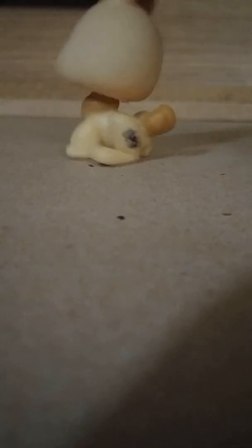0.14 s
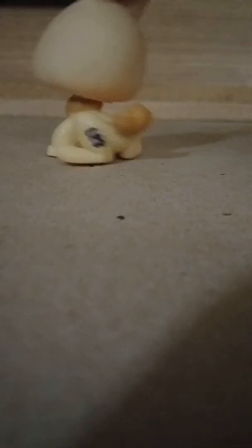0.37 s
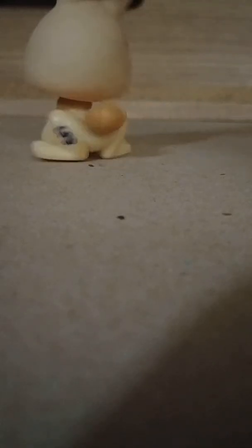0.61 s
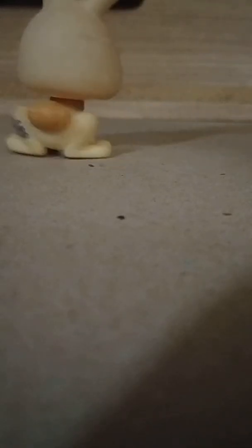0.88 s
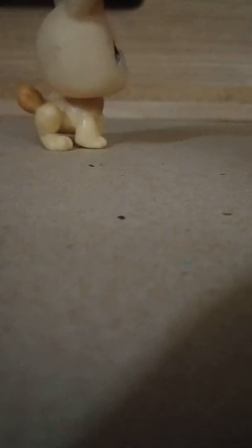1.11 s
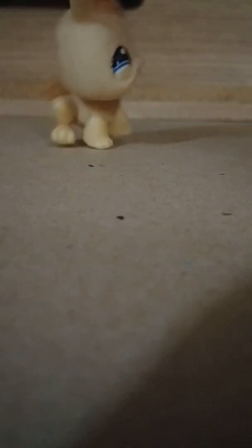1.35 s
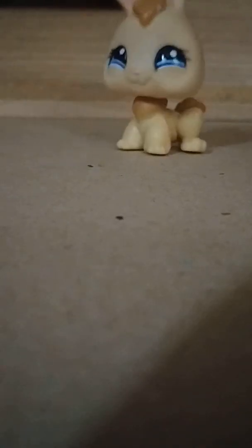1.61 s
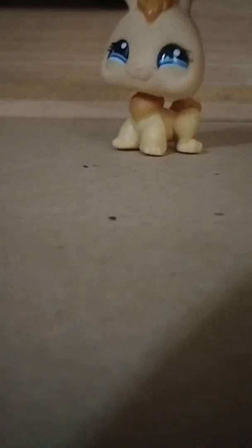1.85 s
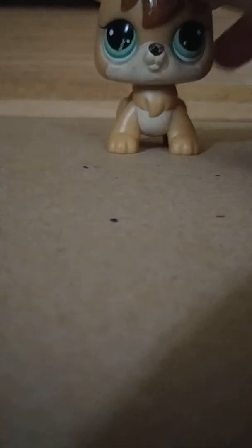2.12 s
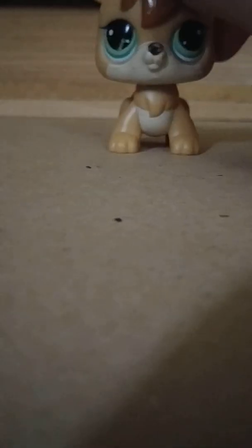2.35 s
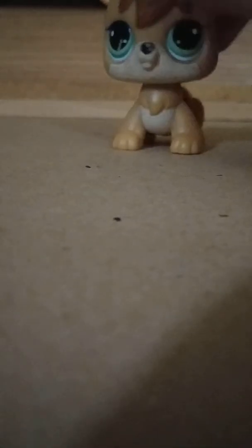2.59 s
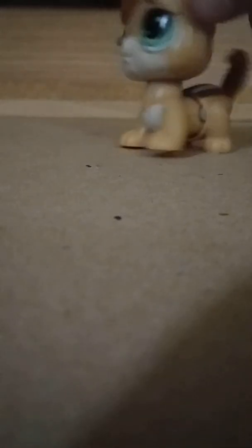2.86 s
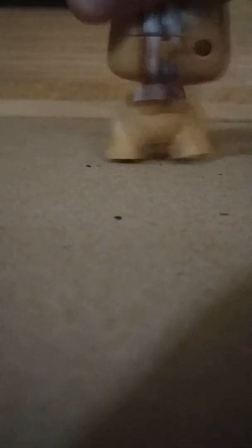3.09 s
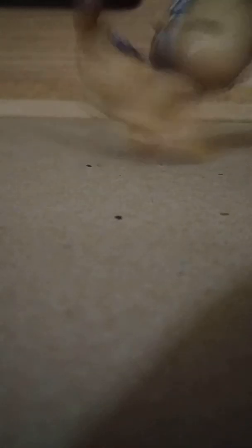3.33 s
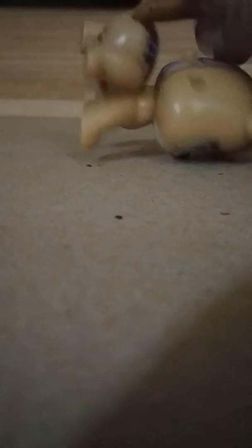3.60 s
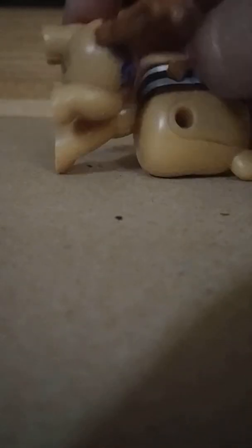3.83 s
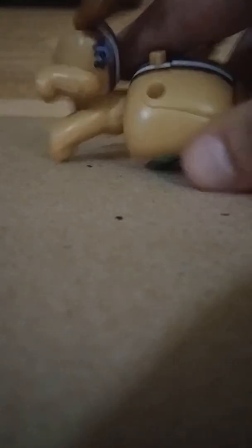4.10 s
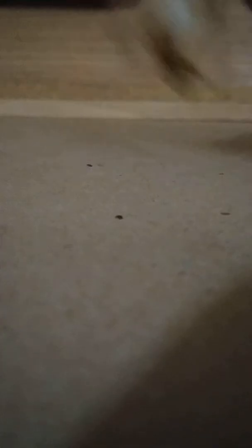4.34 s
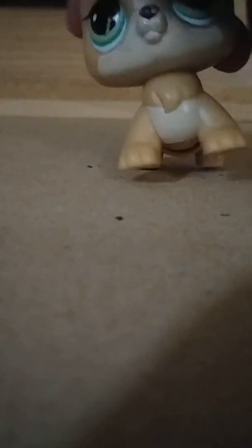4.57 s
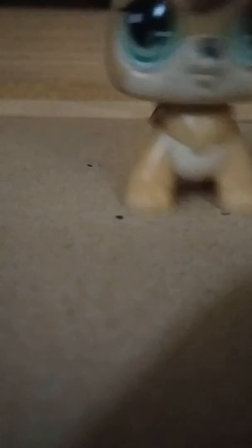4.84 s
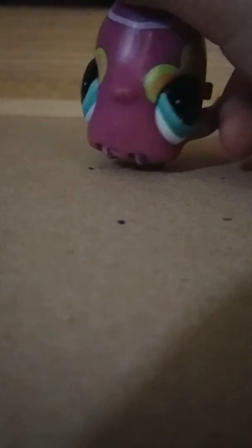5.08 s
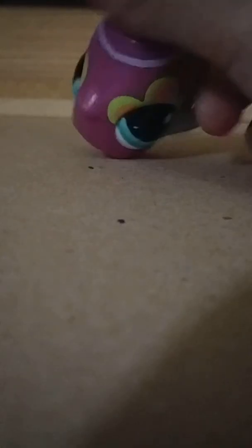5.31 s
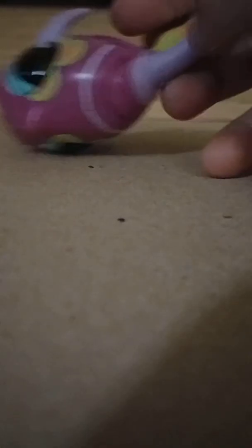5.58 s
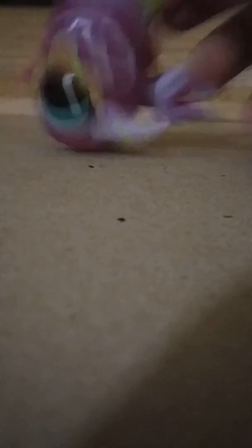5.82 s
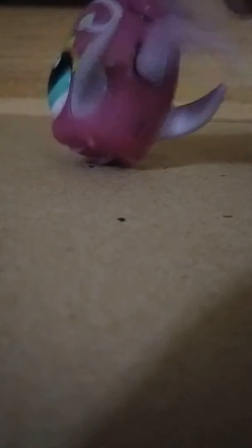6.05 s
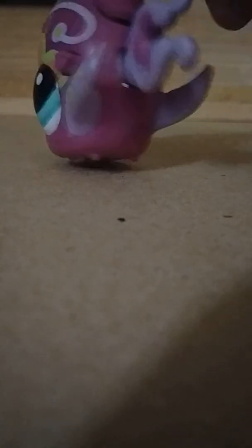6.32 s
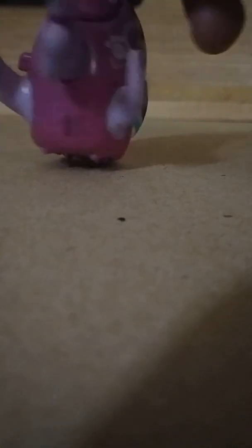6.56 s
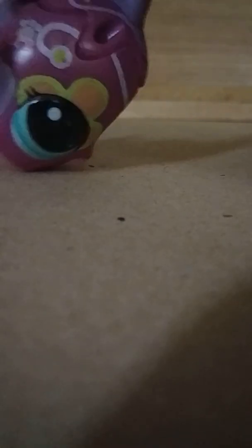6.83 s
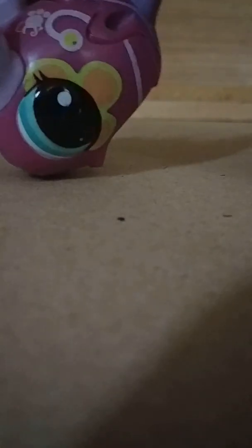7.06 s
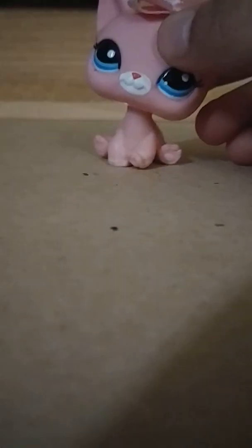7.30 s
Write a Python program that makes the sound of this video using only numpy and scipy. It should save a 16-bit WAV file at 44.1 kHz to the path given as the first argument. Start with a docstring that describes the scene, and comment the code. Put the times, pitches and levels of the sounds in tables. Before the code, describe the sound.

Small hard plastic figures are turned and moved by hand on a covered board, heard very close by a device lying on it. Soft dull bumps and faint rubs come first over low room hum, then a burst of loud boomy thuds with bright clicks and scrapes. A brief drone stops at a sudden cut, followed by gentler knocks and clicks.

```python
"""Over a low mains hum and room noise, small plastic figures are turned, dropped and dragged by hand on a board.
It starts with soft thuds and faint rubbing; from 3.1 s come heavy thuds, bright clicks and dragging feet.
Near 4.9 s a dragged figure drones; at 5 s a splice cuts off thuds, rumble and drone; softer thuds and clicks follow.
Thuds are struck board modes, ticks are noise cracks in shell resonances, rubs are lumpy filtered noise.
A phone lying on the board hears it all: the board directly, the plastic through the air."""
import sys
import numpy as np
from scipy import signal
from scipy.fft import rfft, irfft, next_fast_len
from scipy.io import wavfile
from scipy.ndimage import uniform_filter1d, map_coordinates

SR = 44100
rng = np.random.default_rng(int(sys.argv[2]) if len(sys.argv) > 2 else 0)


def convert_level_to_amplitude(level_db):
    """Map a level in decibels to its linear amplitude factor."""
    exponent = np.asarray(level_db, float) / 20
    return 10 ** exponent


def persist_wave(psi):
    """Save psi, clipped to +-1, as 16-bit WAV."""
    counts = np.round(np.clip(psi, -1, 1) * 32767).astype(np.int16)
    wavfile.write(sys.argv[1], SR, np.atleast_2d(counts).T)


N = 327655
TIME = np.arange(N) / SR
SPLICE_S = 5.002  # a splice: thuds, their settling rumble and the drone are cut off here

# All levels are relative; some sources add a trim.
# hum partials: pitch_hz, level_db
HUM = [(118.4, -48.5), (236.9, -43), (360.7, -55)]
# room noise spectrum: frequency_hz, level_db
ROOM_COLOUR = [(29, -43), (50, -17.5), (102, -1), (165, -6.5), (239, -2), (284, -10), (361, -7.5),
               (403, -16.5), (635, -17.5), (919, -29), (1390, -36), (7730, -56.5), (9000, -65),
               (11700, -88), (19800, -120)]
# likeness of the room noise at left and right: frequency_hz, likeness (0 to 1)
ROOM_LIKENESS = [(60, 1), (130, 0.68), (290, 1), (640, 0.51), (1400, .02)]
# treble shade of the phone's body on the right microphone: frequency_hz, level_db
SHADOW = [(2000, -6), (5000, -3), (8000, -6), (15000, -23)]
# treble colour of the phone: frequency_hz, level_db
PHONE_COLOUR = [(1000, 17.5), (3000, 3), (5200, 7), (6600, -2), (8100, 4), (9400, -11), (10600, -27.5),
                (11900, -19.5), (15400, -23), (16100, -49)]
# resonances of the microphone port, heard louder at the left: pitch_hz, width_hz, level_db (before squaring)
PORT = [(7930, 950, 1), (13100, 3100, -18.5)]
# phase of the board between the microphones: frequency_hz, left_lead_rad
BOARD_LEAD = [(40, .7), (80, 2.6), (150, 1.25), (260, -.9), (420, -1.3), (600, -2.2), (950, -1.1),
              (1900, .6)]
# level of the board between the microphones: frequency_hz, left_over_right_db
BOARD_TILT = [(80, 2), (150, 1), (210, 2.5), (330, 8), (600, -1.5), (1300, 3), (2400, 6)]
# low modes of the board: pitch_hz, level_db, t60_s
BOARD_MODES = [(72.7, -8.5, 0.43), (153.15, 1.5, 0.15), (198.1, 3, 0.11), (228.5, -1.5, 0.18),
               (293, -5.5, 0.16), (329.2, -9, 0.093), (396, -11.5, 0.12)]
# outline of the dense upper modes: pitch_hz, level_db, t60_s
UPPER_OUTLINE = [(496, -27, 0.15), (821, -27.5, 0.093), (1100, -29.5, 0.082), (1850, -45.5, 0.049),
                 (2816, -64, 0.26)]
# rumble kept up by the hand's grip: time_s, level_db
GRIP = [(0.0, -39), (0.23, -44.5), (2.81, -58), (3.33, -70), (3.49, -39.5), (3.72, -21), (3.87, -23.5),
        (4.05, -24), (4.28, -30.5), (4.84, -24), (4.99, -51), (6.0, -22), (6.27, -40), (7.43, -67)]
# position of the hand: time_s, left_over_right_db
HAND = [(0, -1), (0.9, -2), (1.6, -4), (1.8, -16), (2.15, -28), (2.25, -1), (2.6, -6), (3.1, 1.5), (4.5, 1),
        (4.9, 7), (6.1, 23.5), (7.43, -14)]
# sliding strokes: start_s, end_s, feet_on_cover_db, fingers_on_plastic_db, port_hiss_db
STROKES = [(0, 0.023, -48, -59, -89), (0.163, 0.228, -47.5, -63, -78), (0.511, 0.58, -45.5, -60.5, -73),
           (0.624, 0.672, -41, -59.5, -63.5), (0.871, 1.023, -55, -66, -50), (0.932, 1.038, -42, -57, -80),
           (1.143, 1.3, -73, -82, -58.5), (1.325, 1.445, -53, -61.5, -65), (1.37, 1.629, -56.5, -61, -62.5),
           (1.521, 1.554, -43, -66, -76), (1.801, 1.9, -51, -52, -56.5), (2.01, 2.159, -60, -56.5, -69),
           (2.192, 2.316, -74, -58.5, -60), (2.49, 2.625, -51, -58, -70), (2.672, 2.772, -51.5, -57.5, -58),
           (2.817, 2.895, -40.5, -56, -53), (2.903, 3.096, -44.5, -73, -67), (3.013, 3.2, -38, -53, -49.5),
           (3.207, 3.341, -34.5, -48, -45), (3.342, 3.382, -25, -35, -44), (3.368, 3.413, -26, -36, -36),
           (3.426, 3.495, -35, -45, -54), (3.674, 3.757, -42.5, -43, -86), (3.75, 4.039, -39, -46, -55.5),
           (3.943, 4.052, -30, -50, -54), (4.054, 4.229, -41, -43.5, -49.5), (4.201, 4.331, -38, -46, -73),
           (4.435, 4.525, -64.5, -39, -91), (4.505, 4.591, -33.5, -43.5, -82),
           (4.776, 5.003, -25, -38.5, -40.5), (5.232, 5.339, -34.5, -45.5, -65),
           (5.355, 5.442, -29.5, -49.5, -51.5), (5.42, 5.515, -41, -58.5, -52),
           (5.694, 5.864, -45, -66.5, -76), (5.812, 5.901, -36.5, -43.5, -86),
           (6.021, 6.063, -47.5, -60, -55.5), (6.053, 6.13, -33, -47.5, -59), (6.167, 6.259, -52, -67, -76),
           (6.258, 6.324, -45.5, -62, -95), (6.487, 6.522, -52.5, -89.5, -61),
           (6.643, 6.721, -42, -52, -51), (6.736, 6.765, -80.5, -47, -62), (6.777, 6.821, -89, -46, -59),
           (7.129, 7.234, -83, -73, -55.5), (7.199, 7.247, -54, -58, -92)]
# spectrum of feet on the cover: frequency_hz, level_db
SCRAPE_COLOUR = [(250, -39), (420, -22.5), (600, 5.5), (1100, -2.5), (2000, -11.5), (2500, -40),
                 (4000, -76)]
# spectrum of fingers on plastic: frequency_hz, level_db
FINGER_COLOUR = [(880, -54), (1500, -16.5), (2370, -2), (3660, -9), (5280, -5), (6830, -12), (8000, -3.5),
                 (10800, -54), (12000, -21), (15400, -20), (16100, -53)]
# narrow hisses of slipping skin or feet: start_s, end_s, pitch_hz, width_hz (before squaring), level_db
SLIPS = [(1.421, 1.443, 1480, 169, -40), (1.415, 1.456, 2930, 480, -55), (2.045, 2.107, 4400, 2570, -55),
         (2.096, 2.142, 2320, 1400, -42), (2.92, 3.145, 1450, 1467, -51.5), (3.02, 3.075, 13800, 1250, -55),
         (3.126, 3.151, 3770, 343, -42), (3.831, 3.907, 8050, 780, -30), (3.857, 3.903, 12400, 700, -49),
         (4.265, 4.383, 4070, 1600, -44), (4.527, 4.555, 1550, 895, -19), (5.185, 5.21, 2300, 800, -42),
         (6.866, 6.962, 5800, 604, -58)]
# feet sticking and slipping in step with a board mode: start_s, end_s, pitch_hz, level_db
JUDDER = [(4.878, 4.94, 226, -4), (4.944, 5.016, 237, -2)]
# plastic clicks: start_s, level_db, pitch_hz
TICKS = [(3.1305, -38.5, 8100), (3.2637, -39, 6700), (3.3755, -34, 7900), (3.4281, -15.5, 7100),
         (3.474, -30.5, 3150), (3.5232, -39.5, 6600), (3.6251, -40, 7820), (3.6885, -23.5, 6400),
         (3.693, -13, 4730), (3.709, -26, 4600), (3.7234, -27.5, 5530), (3.7407, -35, 5340),
         (3.8379, -34, 6060), (3.8537, -22, 7300), (3.896, -34, 5500), (3.9293, -32, 5440),
         (4.031, -17, 7900), (4.0325, -21, 4800), (4.05, -34.5, 7000), (4.13, -27, 5000), (4.14, -12, 4930),
         (4.156, -23.5, 7440), (4.2414, -21, 4600), (4.2764, -30.5, 7400), (4.4502, -16.5, 8100),
         (4.4495, -15, 4204), (4.4548, -13, 7900), (4.526, -21, 2500), (4.5295, -29.5, 7600),
         (4.5429, -14.5, 7610), (4.794, -37, 5940), (4.802, -20, 5900), (4.817, -27, 7050),
         (4.8814, -23.5, 7550), (5.1847, -29, 2370), (5.1971, -40, 7700), (5.2544, -26, 5350),
         (5.257, -44, 13500), (5.2868, -34, 5900), (5.7692, -41.5, 6390), (5.7752, -36, 2260),
         (5.8371, -29.5, 5300), (5.8434, -22, 2360), (5.8546, -24.5, 7270), (5.8645, -22, 2650),
         (5.8966, -27.5, 2060), (6.0775, -31.5, 6400), (6.0777, -19.5, 2100), (6.0944, -22, 2200),
         (6.096, -25.5, 7000), (6.1087, -32, 7400), (6.117, -30.5, 5400), (6.211, -36.5, 8760),
         (6.2192, -42, 7300), (6.2756, -36, 7300), (6.2758, -27.5, 2190), (6.4971, -32.5, 8530),
         (6.499, -44, 13200), (6.7381, -33, 3120), (6.7535, -21, 5150), (6.7575, -22.5, 2650),
         (6.772, -37.5, 2840), (6.789, -25.5, 2800), (6.7985, -32, 5200), (6.805, -31, 8160),
         (7.2, -46.5, 2770)]
# landings on the board: start_s, level_db, hardness_db (upper modes against lower)
THUDS = [(0.02, -25.5, -12), (0.122, -29.5, -41), (0.364, -27.5, -26), (0.514, -23, -18),
         (0.539, -31.5, -7), (0.637, -23, -12), (0.84, -26.5, -26), (0.966, -30.5, -2.5), (0.993, -26, -10),
         (1.005, -27.5, -37), (1.374, -43, -9), (1.392, -39, -14), (1.42, -42.5, 1), (1.508, -27, -15.5),
         (1.521, -29.5, -9), (1.539, -34, -9.5), (1.592, -28, -13.5), (1.703, -26.5, -20.5),
         (1.945, -24, -22.5), (1.997, -29, -18), (2.826, -36, -2), (3.133, -17, -12.5), (3.151, -9, -17.5),
         (3.231, -31.5, -1.5), (3.257, -7.5, -22), (3.3738, 0.5, -15), (3.427, 9.5, -14), (3.689, 3.5, -14),
         (3.817, -6.5, -27.5), (3.849, -18.5, -7.5), (3.879, -5.5, -34), (3.98, -3, -26),
         (4.025, -1.5, -29.5), (4.1366, -1, -14), (4.237, -1.5, -10), (4.4485, 0, -6.5), (4.532, -5.5, -15),
         (4.73, -17, -31), (4.791, -0.5, -25), (4.816, -1, -17.5), (4.836, 0, -47), (4.864, -7.5, -9.5),
         (5.183, -25.5, -37.5), (5.254, -6, -33), (5.405, -16.5, -17), (5.471, -13.5, -27.5),
         (5.764, -15, -26.5), (5.822, -18.5, -19.5), (5.837, -7.5, -24), (5.88, -8, -23.5),
         (5.925, -4.5, -33.5), (6.064, -21, -19), (6.078, -9.5, -35), (6.278, -30, -15),
         (6.693, -24.5, -17.5), (6.849, -17.5, -38), (7, -24, -29), (7.242, -26, -29.5)]


def unit(x):
    """Scale to rms 1."""
    return x / np.sqrt(np.mean(x ** 2) + 1e-20)


def along(points, hz):
    """Read (frequency, value) points on a log frequency axis."""
    f, value = np.transpose(points)
    return np.interp(np.log(hz + 1), np.log(f + 1), value)


def wobble(rate):
    """A smooth random curve with rate knots a second."""
    return map_coordinates(rng.standard_normal(int(N * rate / SR) + 4), [TIME * rate])


def filtered(x, response):
    """Filter x with a complex response of frequency."""
    m = next_fast_len(N + SR // 2)
    return irfft(rfft(x, m) * response(np.fft.rfftfreq(m, 1 / SR)), m)[..., :N]


def resonances(modes):
    """Response of summed (pitch_hz, width_hz, level_db) resonances, alternating in sign."""
    def response(f):
        return sum((-1) ** k * convert_level_to_amplitude(db) * 1j * f * width / (hz * hz - f * f + 1j * f * width)
                   for k, (hz, width, db) in enumerate(modes))
    return response


def pair(likeness):
    """Two white noises with the given likeness by frequency."""
    def mid_side(hz):
        turn = np.arccos(np.clip(along(likeness, hz), -1, 1)) / 2
        return np.array([np.cos(turn), np.sin(turn)])
    mid, side = filtered(rng.standard_normal((2, N)), mid_side)
    return np.array([mid + side, mid - side])


def grit(likeness, rate, rough_db):
    """Friction noise: fibres catch and let go, so the force comes in lumps."""
    return unit(pair([(1000, likeness)]) * convert_level_to_amplitude(rough_db * wobble(rate)))


def airborne(x):
    """Sound through the air reaches the right microphone late and shaded."""
    lag_s = 0.000671
    right = filtered(x[1], lambda hz: convert_level_to_amplitude(along(SHADOW, hz)) * np.exp(-2j * np.pi * hz * lag_s))
    return np.array([x[0], right])


def pickup(hz):
    """How each microphone feels the board at a frequency."""
    left = convert_level_to_amplitude(along(BOARD_TILT, hz) / 2) * np.exp(.5j * along(BOARD_LEAD, hz))
    return np.array([left, 1 / left])


def unspliced(start, t):
    """Gate that silences whatever began before the splice from the splice onwards."""
    return (start > SPLICE_S) | (t < SPLICE_S)


def swell(start, end, t=TIME):
    """A stroke swells over its first two fifths and fades over the rest; one ending at the splice stops short."""
    fade = .002 if abs(end - SPLICE_S) < .02 else 0.5 * (end - start)
    return np.interp(t, [start, start + 0.39 * (end - start), end - fade, end + fade / 2], [0, 1, 1, 0])


def stroking(column):
    """Gain over time of one level column of the strokes."""
    t = TIME[::32]  # a coarse curve is enough
    return np.interp(TIME, t, sum(convert_level_to_amplitude(row[column]) * swell(row[0], row[1], t) for row in STROKES))


def room():
    """An appliance hums near the mains harmonics, slightly unsteady, over patchy room noise."""
    hum = 0
    for hz, db in HUM:
        level = np.sqrt(2) * convert_level_to_amplitude(db + 0.37 * wobble(8.1))
        hum = hum + level * np.sin(2 * np.pi * hz * TIME + 0.8 * wobble(10))
    noise = unit(filtered(pair(ROOM_LIKENESS), lambda hz: convert_level_to_amplitude(along(ROOM_COLOUR, hz))))
    noise = convert_level_to_amplitude(-39.5 + 0.66 * wobble(4.2)) * noise
    return hum * convert_level_to_amplitude([[.8], [-.8]]) + noise * convert_level_to_amplitude([[1.2], [-1.2]])


def shaking():
    """Grip, dragged feet and rocking figures keep the low modes rumbling; the soft cover dulls the treble."""
    drag_db = 14  # rumble over the scrape of the feet
    settle_db, settle_t60_s = -6.5, 0.24  # a landed figure rocks to rest
    settling = 0
    for start, db, _ in THUDS:
        decay = convert_level_to_amplitude(db + settle_db - 60 * np.abs(TIME - start) / settle_t60_s)
        settling = settling + (TIME > start) * unspliced(start, TIME) * decay
    gain = convert_level_to_amplitude(np.interp(TIME, *np.transpose(GRIP))) + convert_level_to_amplitude(drag_db) * stroking(column=2) + settling
    board = resonances([(hz, 7.5 / t60, db) for hz, db, t60 in BOARD_MODES])
    rumble = filtered(grit(0.72, 40, rough_db=2.5), lambda hz: board(hz) * pickup(hz) / (1 + (hz / 700) ** 2))
    return uniform_filter1d(gain, size=130) * unit(rumble)


def rubbing():
    """Feet drag over the cover and fingers slide on the plastic, as lumpy friction noise."""
    pan_db = np.interp(TIME, *np.transpose(HAND))
    sliding = stroking(column=3) * convert_level_to_amplitude(pan_db * np.array([[.5], [-.5]]))
    scrape = filtered(grit(0.21, 150, rough_db=2.5), lambda hz: convert_level_to_amplitude(along(SCRAPE_COLOUR, hz)) * pickup(hz))
    fingers = filtered(grit(0.11, 280, rough_db=3.5), lambda hz: convert_level_to_amplitude(along(FINGER_COLOUR, hz)))
    hiss = filtered(grit(0.74, 180, rough_db=3.0), lambda hz: resonances(PORT)(hz) ** 2)
    port_hiss = stroking(column=4) * unit(hiss) * convert_level_to_amplitude([[3], [-1]])
    return stroking(column=2) * unit(scrape) + airborne(sliding * unit(fingers) + port_hiss)


def slips():
    """Short slips of skin or feet, each exciting one narrow resonance."""
    out = np.zeros((2, N))
    for start, end, hz, width, db in SLIPS:
        span = slice(round((start - .05) * SR), round((end + .05) * SR))
        length = span.stop - span.start
        f = np.fft.rfftfreq(length, 1 / SR)
        noise = rng.standard_normal(length) + rng.standard_normal((2, length))  # shared plus separate
        narrow = irfft(rfft(noise) * resonances([(hz, width, 0)])(f) ** 2, length)
        out[:, span] += convert_level_to_amplitude(db) * swell(start, end)[span] * unit(narrow)
    return airborne(out)


def judder():
    """A dragged figure locks onto one mode of the board and makes it drone, a little unsteady."""
    drone = 0
    for start, end, hz, db in JUDDER:
        level = convert_level_to_amplitude(db + 0.62 * wobble(30)) * swell(start, end)
        drone = drone + level * pickup(hz)[:, None] * np.exp(2j * np.pi * hz * TIME + .4j * wobble(24))
    return np.sqrt(2) * drone.imag * np.clip((SPLICE_S - TIME) / .002 + .5, 0, 1)


def crackles():
    """Small chance clicks that follow the level of the sliding fingers, as rows like the ticks."""
    rate_per_s, level_db, spread_db = 70, -4, 2.5  # the faintest are dropped below
    when, size, pitch = rng.random((int(rate_per_s * N / SR), 3)).T
    slide = stroking(column=3)[(when * N).astype(int)]
    db = 20 * np.log10(slide + 1e-6) + level_db - spread_db * np.log(1 - size)
    return [row for row in zip(when * N / SR, db, 2400 * 3.4 ** pitch) if row[1] > -70]


def ticks():
    """A plastic click: a milliseconds-long crack in a broad shell resonance, then the nearby walls' short hiss."""
    out, t = np.zeros((2, N + SR)), np.arange(SR // 10) / SR
    clicks = TICKS + crackles()
    noise = rng.standard_normal((len(clicks), 3, len(t)))
    f = np.fft.rfftfreq(2 * len(t), 1 / SR)
    for (start, db, hz), (crack, *walls) in zip(clicks, noise):
        burst = crack * (1 - np.exp(-t / 0.00071)) * convert_level_to_amplitude(-60 * t / 0.012) * convert_level_to_amplitude([[3], [-8]])
        burst = burst + convert_level_to_amplitude(-16.0) * np.array(walls) * (1 - np.exp(-t / 0.0018)) * convert_level_to_amplitude(-60 * t / 0.07)
        shell = resonances([(hz, .2 * hz, 2)])(f) + (hz / 8000) ** 0.74 * f / 8000
        colour = shell * convert_level_to_amplitude(along(PHONE_COLOUR, f) - along(PHONE_COLOUR, hz))
        colour = colour / (1 + (0.76 * hz / (f + 1)) ** 3)  # a small shell sends out little below its resonance
        click = irfft(rfft(burst, 2 * len(t)) * colour)[:, :len(t)]
        out[:, round(start * SR):][:, :len(t)] += convert_level_to_amplitude(db + 19.0) * click
    return airborne(out[:, :N])


def thuds():
    """Each landing rings the board at new strengths; a hard contact is shorter and wakes the upper modes."""
    bend_s = .0013  # travel time of the bending waves at 1 kHz; treble arrives first
    crack_db, low_hz, high_hz = -2, 600, 1950  # level and band of the first wave
    cover_hz = 2500  # the cover's cut-off
    out, t = np.zeros((2, N + SR)), np.arange(SR // 8) / SR

    edges, *outline = np.transpose(UPPER_OUTLINE)
    dense = np.geomspace(edges[0], edges[-1], num=44)
    upper_modes = [dense] + [along(np.transpose([edges, v]), dense) for v in outline]
    hz, level_db, t60 = np.hstack([np.transpose(BOARD_MODES), upper_modes])
    upper = np.arange(len(hz)) >= len(BOARD_MODES)

    f = np.fft.rfftfreq(len(t), 1 / SR) + 1
    band = 1 / np.sqrt((1 + (low_hz / f) ** 4) * (1 + (f / high_hz) ** 12))
    crack = irfft(-band * pickup(f) * np.exp(-4j * np.pi * bend_s * np.sqrt(1000 * f)), len(t))
    crack = crack / np.abs(crack).max()

    since = np.maximum(t - bend_s * np.sqrt(1000 / hz)[:, None], 0)  # time since each mode's wave front came
    build_up = 1 - np.exp(-since / np.where(upper, .0012, .002)[:, None])  # the low modes build up more slowly
    chance = rng.standard_normal((len(THUDS), 4, len(hz)))
    for (start, db, hard_db), (size, phase, detune, spot) in zip(THUDS, chance):
        # the weight of hand and figure shifts the modes a little from blow to blow
        turning = 2j * np.pi * hz * (1 + 0.035 * detune)
        rings = np.exp((turning - np.log(1000) / t60)[:, None] * since) * build_up
        contact = 1 - np.exp(-t / (0.00044 * convert_level_to_amplitude(-.6 * (hard_db + 5))))
        contact = contact * np.sqrt(1 - t / t[-1])
        strength = convert_level_to_amplitude(level_db + upper * (hard_db + 25.0) + 1.8 * size)
        strength = strength * -np.exp(1j * np.where(upper, 1.5, 0.3) * phase)
        # each landing spot reaches the two microphones differently
        reach = pickup(hz) * np.exp(0.45j * upper * spot * [[1], [-1]])
        blow = contact * ((reach * strength) @ rings).imag
        body = contact * (strength[~upper] @ rings[~upper]).imag  # the low modes set the size of the blow
        blow = blow / np.abs(body).max() + convert_level_to_amplitude(crack_db + hard_db + 5) * crack
        out[:, round(start * SR):][:, :len(t)] += unspliced(start, start + t) * convert_level_to_amplitude(db + 4.5) * blow
    return signal.sosfilt(signal.butter(3, cover_hz, fs=SR, output="sos"), out[:, :N])


def scene():
    """Everything that reaches the two microphones."""
    return room() + shaking() + rubbing() + slips() + judder() + ticks() + thuds()


def top_cut(x):
    """Nothing passes above the cut-off."""
    return signal.sosfilt(signal.butter(12, 16470, fs=SR, output="sos"), x)


def record(dry):
    """The microphones cut deep bass; gain control ducks after loud blows and recovers; tops clip softly."""
    noisy = dry + convert_level_to_amplitude(-86.5) * rng.standard_normal(dry.shape)  # the microphones' own hiss
    x = signal.sosfilt(signal.butter(2, 62, "highpass", fs=SR, output="sos"), noisy)
    keep = np.exp(-1 / (.12 * SR))  # 0.12 s memory of the gain control
    # the gain control starts afresh just after the splice
    parts = np.split(np.mean(x ** 2, axis=0), [round((SPLICE_S + .006) * SR)])
    power = np.hstack([signal.lfilter([1 - keep], [1, -keep], part) for part in parts])
    power = uniform_filter1d(power, size=200)
    x = x * (1 + power / convert_level_to_amplitude(2 * -21)) ** -.4
    hiss = signal.sosfilt(signal.butter(1, 3500, fs=SR, output="sos"), rng.standard_normal(dry.shape))
    x = x + convert_level_to_amplitude(-62) * hiss  # hiss behind the gain control
    mix = x / (1 + np.abs(x) ** 6) ** (1 / 6)
    return top_cut(mix)


dry = scene()
out = record(dry)
persist_wave(out)
```